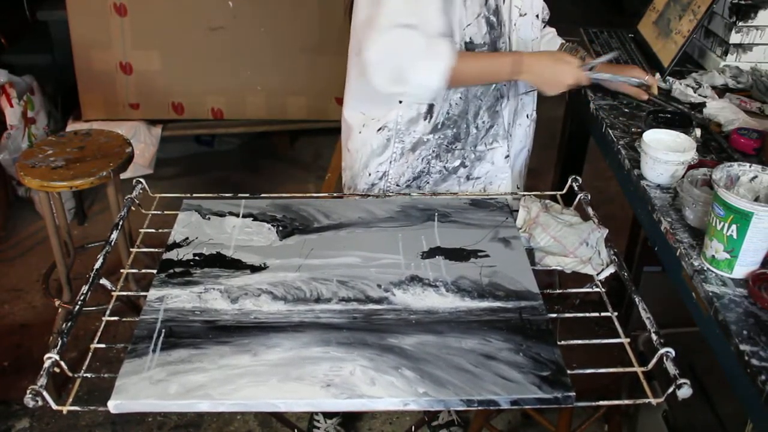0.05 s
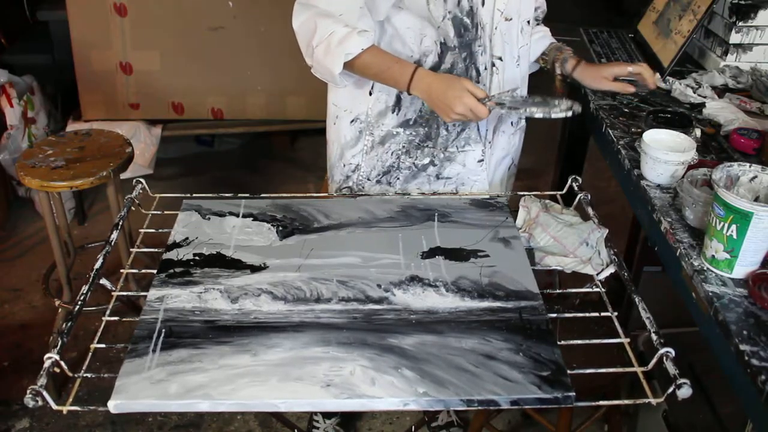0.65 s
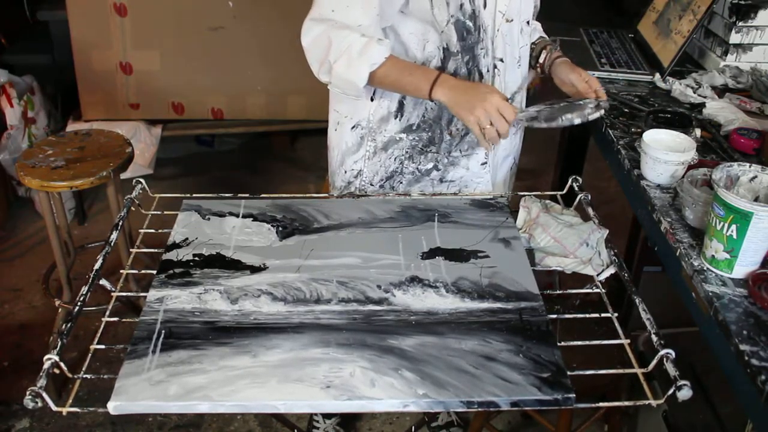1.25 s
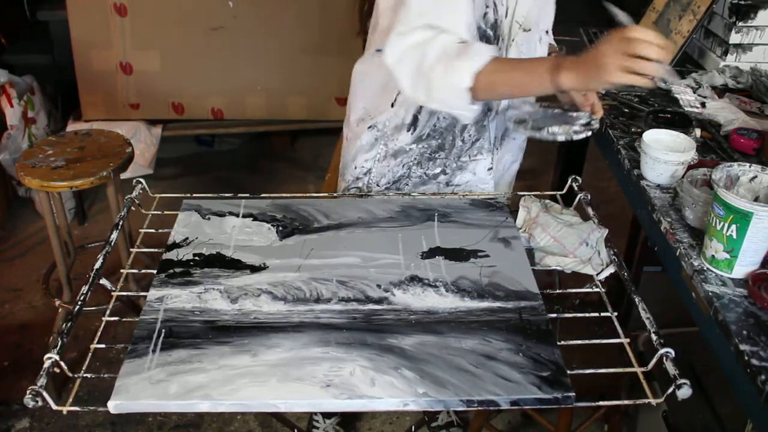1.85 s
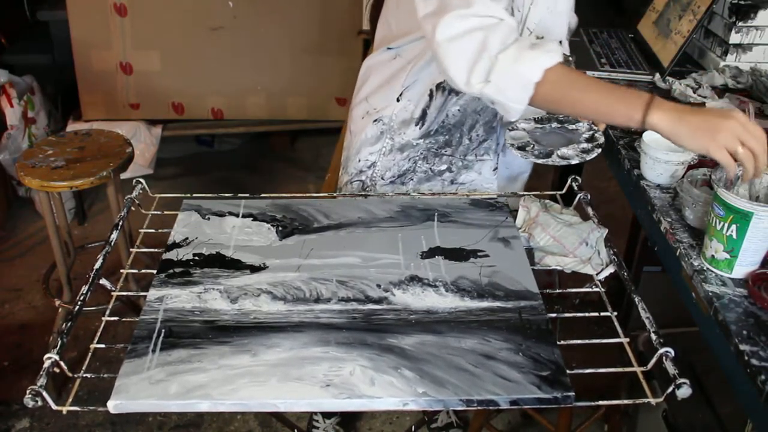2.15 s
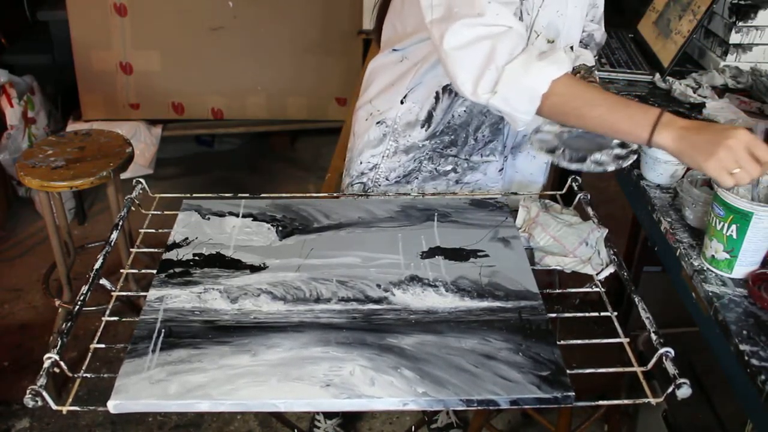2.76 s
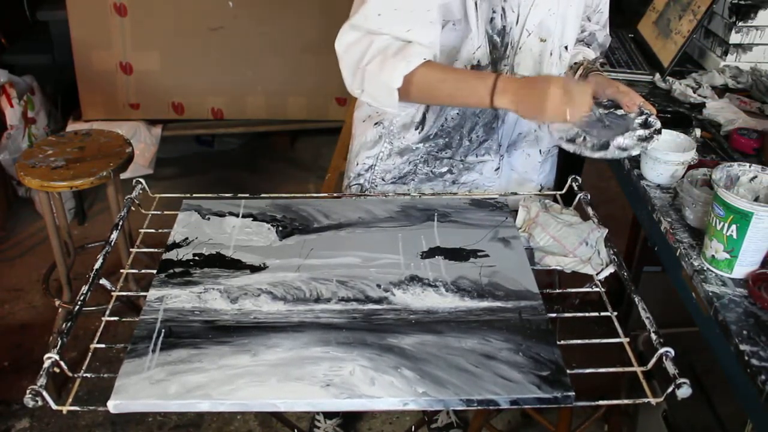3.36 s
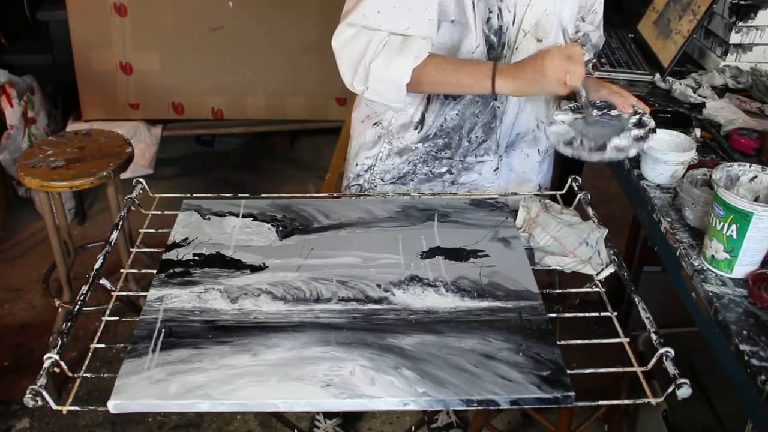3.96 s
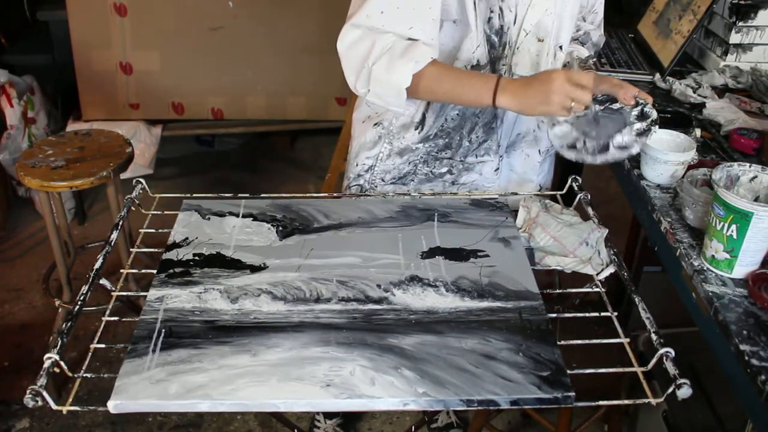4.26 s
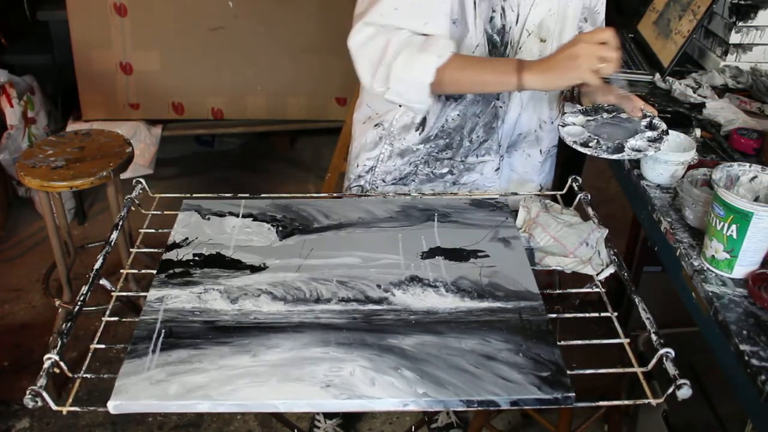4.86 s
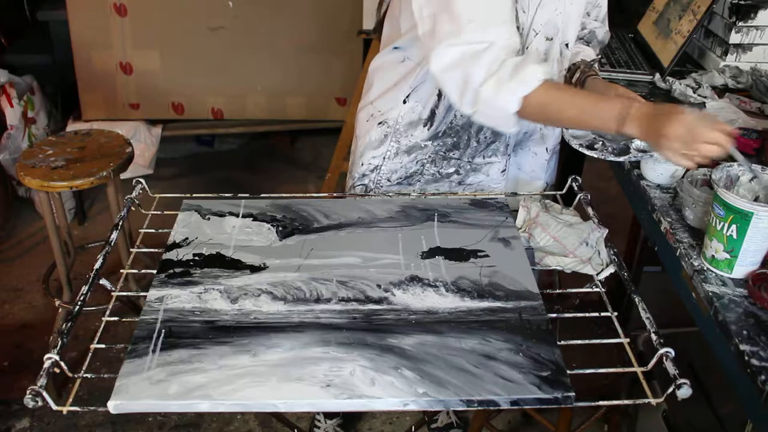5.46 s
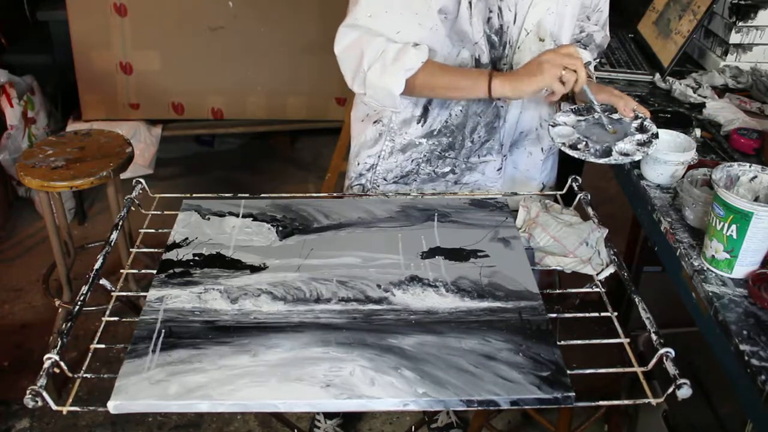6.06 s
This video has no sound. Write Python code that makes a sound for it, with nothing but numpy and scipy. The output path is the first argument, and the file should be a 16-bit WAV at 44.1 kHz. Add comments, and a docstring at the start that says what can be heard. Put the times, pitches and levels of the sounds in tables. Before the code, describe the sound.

Brush handles clink brightly and knock on a wooden workbench as a painter picks through them, and a thin one bounces to rest. A handle clacks sharply on a handheld palette, and clothing rustles faintly. The brush ticks on a paint tub, then dabs and swishes softly through wet paint, with a few dull thumps of the palette. A fan and a lamp hum steadily in the small, slightly echoing studio.

```python
"""Brush handles clink and knock on a workbench as a painter picks through them; a thin one bounces to rest.
Just after a second, a handle clacks and chatters on the handheld palette. Sleeve and smock rustle.
The brush then taps a paint tub and the palette, and from about three seconds on it dabs and swishes
through wet paint, the palette thumping in the hand.
A small studio echoes it all, and a fan and a lamp hum from start to end."""
import sys
import numpy as np
from scipy import signal
from scipy.fft import rfft, irfft, next_fast_len
from scipy.io import wavfile
from scipy.ndimage import uniform_filter1d

SR = 44100
rng = np.random.default_rng(int(sys.argv[2]) if len(sys.argv) > 2 else 0)


def to_wav(s):
    """Save 16-bit WAV."""
    ch = np.atleast_2d(s).T  # columns
    pcm = np.round(np.clip(ch, -1, 1) * 32767)  # PCM
    wavfile.write(sys.argv[1], SR, pcm.astype(np.int16))


N = 273861
TIME = np.arange(N) / SR
AGE = TIME[:SR // 2]  # seconds since a hit

# The workbench's woody modes. Each row: pitch in Hz, relative level in dB, t60 in seconds.
BENCH_MODES = [(347, -4, 0.24), (486, 6, 0.19), (558, 0, 0.039), (631, -0.5, 0.18), (755, 0, 0.18),
               (1023, 0.5, 0.11), (1571, 1.5, 0.055)]


def handle_hits(contacts, modes):
    """A hard handle snaps, rings and buzzes against its neighbours; each hit also shakes the bench."""
    # The tone of the bench. Each row: frequency in Hz, gain in dB.
    bench_eq = [(120, -31), (300, 6), (450, -6.5), (800, -1.5), (1200, -8.5), (2000, -6), (3500, -8.5),
                (6000, -11.5), (16000, -79)]
    out = np.zeros(N)
    for s, db, hz, bench_db in contacts:
        contact = blow(modes, crack_t60=.014, ring_db=-9, snap_db=17)
        buzz = amp(-5.5) * punch(burst(0.041))
        boards = blow(BENCH_MODES, crack_t60=.15, ring_db=-12, snap_db=0)
        clink = colour(contact + buzz, hump(hz, below_db=-28.0, above_db=-13.5))
        add(out, s, amp(db) * punch(clink) + amp(bench_db) * punch(colour(boards, bench_eq)))
    return out


def rummage():
    """Brush handles clink brightly together on the bench."""
    # Each row: start in seconds, clink level in dB, brightness in Hz, bench level in dB.
    clinks = [(0.0282, -20.5, 6150, -35.5), (0.0475, -25.5, 13000, -30), (0.054, -33, 6500, -42),
              (0.1136, -36, 6140, -39.5), (0.2243, -15, 9100, -46), (0.2305, -21, 6800, -31),
              (0.2859, -26.5, 7600, -38.5), (0.7914, -38, 5440, -42.5), (0.8374, -46, 6600, -47),
              (1.0363, -46.5, 6100, -66)]
    # A handle's ring. Each row: pitch in Hz, relative level in dB, t60 in seconds.
    handle_modes = [(3661, -27, 0.12), (4000, -13, 0.16), (4970, 7, 0.086), (5940, 0, 0.1),
                    (5910, 7.5, 0.042), (6710, 9.5, 0.046), (6900, 2, .09), (7130, 13.5, 0.039),
                    (7700, -14, .07), (8180, -15, 0.07), (8100, 12, 0.042), (9300, 4, 0.056),
                    (10900, -2, 0.025), (9840, 10, 0.036), (11100, -9, 0.057), (12650, -13, .05)]
    return handle_hits(clinks, handle_modes)


def dropped_brush():
    """A thin brush bounces to rest, each hit weaker, each flight a set share of the one before."""
    # The thin handle's ring. Each row: pitch in Hz, relative level in dB, t60 in seconds.
    thin_modes = [(2200, 2, .08), (2680, 7, 0.078), (4720, 12, 0.075), (5550, 6, 0.16), (7260, -7, 0.09),
                  (7550, -7, 0.078), (8450, 15, 0.063), (9000, 14, 0.073), (9700, 9, 0.044),
                  (10250, 12, 0.047), (10930, -4, 0.11), (12100, 1, 0.045), (13500, -8, .05),
                  (14300, -1, .05)]
    drop_s, first_flight_s, restitution = 0.4452, 0.0574, 0.739
    clink_db, clink_loss_db, brightness_hz = -25.5, 3, 9800
    bench_db, bench_loss_db = -36, 2.1
    landings = drop_s + first_flight_s * (1 - restitution ** np.arange(7)) / (1 - restitution)
    contacts = [(s, clink_db - k * clink_loss_db, brightness_hz, bench_db - k * bench_loss_db)
                for k, s in enumerate(landings)]
    return handle_hits(contacts, thin_modes)


def palette_clack(count):
    """A hard handle chatters on the palette and wakes its high modes, each contact weaker."""
    # The palette's bright ring. Each row: pitch in Hz, relative level in dB, t60 in seconds.
    palette_modes = [(484, -5, 0.19), (1133, 10, 0.062), (1250, -3, 0.052), (1556, 4, 0.061),
                     (2172, 1.5, .1), (2280, 4, 0.053), (3170, -16, .1), (3620, -16, 0.096),
                     (3770, -6, 0.14), (3870, -7, 0.15), (4520, -16, 0.11), (5860, -2, 0.077),
                     (5950, -6, 0.11), (7460, -5, 0.096), (8200, -15, 0.066), (9080, 9, 0.034),
                     (10800, -2, 0.068)]
    # The tone of the crack. Each row: frequency in Hz, gain in dB.
    crack_eq = [(120, -12), (330, 2.5), (700, -2), (1200, 6.5), (2300, -3), (3000, 1.5), (4000, -1.5),
                (5900, 1), (6600, -8), (7400, 2), (9100, -3.5), (12000, -6.5), (16000, -21)]
    start_s, gap_s, first_db, loss_db = 1.1911, 0.0098, -21.5, 5
    out = np.zeros(N)
    for k in range(count):
        crack = colour(burst(t60=0.07), crack_eq)
        contact = punch(crack) + amp(-3) * ring(palette_modes)
        add(out, start_s + k * gap_s, amp(first_db - k * loss_db) * contact)
    return out


def knocks():
    """Wood bumps on the bench and the tub: a softer contact, a duller sound."""
    # Each row: start in seconds, level in dB, brightness in Hz.
    bumps = [(0.001, -30, 2660), (0.063, -26.5, 1440), (0.208, -29.5, 700), (0.252, -29, 600),
             (0.797, -42.5, 1720), (0.877, -48.5, 1320), (1.734, -47, 760), (2.289, -50, 1700),
             (2.3265, -47.5, 1640), (2.386, -41, 2000), (2.752, -48, 1760)]
    out = np.zeros(N)
    for s, db, hz in bumps:
        contact = blow(BENCH_MODES, crack_t60=.055, ring_db=-10, snap_db=5)
        add(out, s, amp(db) * punch(colour(contact, hump(hz, below_db=-18.5, above_db=-10.5))))
    return out


def dabs():
    """Soft bristles flex the whole palette, which thumps in the hand."""
    # Each row: start in seconds, level in dB, brightness in Hz.
    pushes = [(3.351, -39.5, 600), (3.563, -46.5, 560), (4.3414, -20.5, 600), (5.834, -28, 340)]
    # The held palette's low modes. Each row: pitch in Hz, relative level in dB, t60 in seconds.
    held_modes = [(191, -12, 0.1), (315, -2.5, 0.091), (446, 4.5, 0.048), (520, 1.5, 0.027),
                  (675, -1.5, 0.037), (787, -3.5, 0.051)]
    attack_s, cushion_hz = 0.0015, 905  # the bristles cushion the push
    flex = ring(held_modes) * (1 - np.exp(-AGE / attack_s))
    flex = signal.sosfilt(signal.butter(4, cushion_hz, fs=SR, output="sos"), flex)
    out = np.zeros(N)
    for s, db, hz in pushes:
        add(out, s, amp(db) * punch(colour(flex, hump(hz, below_db=-14.5, above_db=-8.5))))
    return out


def ferrule_ticks():
    """The ferrule snaps on the rim of tub or palette, and the spot rings roughly and briefly."""
    # Each row: start in seconds, snap level in dB, ring pitch in Hz, ring level in dB.
    taps = [(2.4256, -47, 4360, -42.5), (2.429, -61, 2460, -42), (2.7257, -57, 4700, -49.5),
            (2.741, -57, 3760, -48), (3.3517, -42, 4540, -47), (3.355, -53, 1210, -48),
            (3.5632, -52.5, 4440, -51.5), (3.9766, -45, 4020, -60), (4.34, -39, 1380, -42.5),
            (4.564, -43, 4000, -44), (5.8342, -46.5, 1650, -54)]
    out = np.zeros(N)
    for s, snap_db, hz, ring_db in taps:
        snap = colour(burst(0.043), hump(6100, below_db=-6.5, above_db=-8.5))
        resonance = signal.iirpeak(hz, Q=6, fs=SR)
        spot = signal.lfilter(*resonance, signal.lfilter(*resonance, burst(0.048)))
        add(out, s, amp(snap_db) * punch(snap) + amp(ring_db) * punch(spot))
    return out


def bristles():
    """Hairs bend, slide through wet paint as the pressure eases, and lift."""
    # Each row: start in seconds, length in seconds, level in dB, rasp pitch in Hz.
    strokes = [(3.395, 0.042, -52.5, 4020), (3.577, 0.1, -54, 4100), (3.991, 0.037, -48.5, 3600),
               (4.067, 0.033, -50, 4130), (4.296, 0.038, -41.5, 1540), (4.425, 0.02, -45, 8350),
               (4.546, 0.072, -47, 1630), (4.771, 0.041, -43, 3730), (5.942, 0.08, -51, 3840),
               (6.107, 0.11, -51.5, 3900)]
    attack_s, ease_db_per_s, release_s = 0.016, 29, 0.011
    out = np.zeros(N)
    for (s, length, db, _), rasp in zip(strokes, rub([hz for *_, hz in strokes])):
        age = np.maximum(TIME - s, 0)
        press = (1 - np.exp(-age / attack_s)) * amp(db - ease_db_per_s * age)
        lift = np.exp(-np.maximum(age - length, 0) / release_s)
        out += press * lift * rasp
    return out


def sleeve():
    """Cloth slides over cloth, swelling and fading with each reach of the arm."""
    # Each row: peak time in seconds, level in dB, rasp pitch in Hz.
    reaches = [(1.41, -61, 1570), (1.88, -54.5, 5130), (2.07, -57, 4000), (5.12, -57.5, 1570),
               (5.68, -60.5, 2130)]
    rasps = rub([hz for *_, hz in reaches])
    return sum(amp(db) * swell(s, spread_s=0.069) * rasp for (s, db, _), rasp in zip(reaches, rasps))


def rub(pitches):
    """Countless fibres slip and catch; one rasping texture for each pitch."""
    # The tone of rubbing fibres. Each row: frequency in Hz, gain in dB.
    fibre_eq = [(300, -27), (1000, -1.5), (1550, 4.5), (1900, -1.5), (2400, 3.5), (3000, -1), (3900, 1.5),
                (6000, -3.5), (8300, -2.5), (10000, -7.5), (12000, -9), (16000, -27)]
    grain = rng.standard_normal(N) * amp(1.95 * rng.exponential(size=N) + 2.1 * wander(60))
    slips = colour(grain, fibre_eq)
    return [unit(slips + 0.85 * signal.lfilter(*signal.iirpeak(hz, Q=6, fs=SR), slips))
            for hz in pitches]


def smock():
    """Heavy cloth gives a low, soft flutter as the arm moves."""
    # Each row: peak time in seconds, level in dB, spread in seconds.
    flaps = [(2.05, -49.5, 0.028), (3.02, -50.5, 0.098), (4.27, -51, 0.036)]
    motion = sum(amp(db) * swell(s, spread) for s, db, spread in flaps)
    return motion * unit(colour(rng.standard_normal(N), hump(273, below_db=-25.0, above_db=-20.5)))


def studio(x, wet_db, bass_db, build_s):
    """Direct sound from the right, then dense reflections whose treble dies first."""
    noise = diffuse(len(AGE), alike_hz=1570)
    low = signal.sosfilt(signal.butter(1, 3500, fs=SR, output="sos"), noise)
    tail = low * fade(.25) + (noise - low) * fade(.12)
    tail = amp(wet_db) * unit(tail * (1 - np.exp(-AGE / build_s))) / np.sqrt(len(AGE))
    send = colour(x, [(500, bass_db), (3000, 0)])  # a little less bass goes into the room's echo
    direct = np.array([np.append(0, x[:-1]), x])
    return direct + signal.fftconvolve(send[None], tail, axes=1)[:, :N]


def fan():
    """A wavering low drone, narrow fluttering tones, duct rumble and a smooth hiss of air."""
    # The fluttering tones. Each row: pitch in Hz, level in dB, width in Hz.
    tones = [(50, -66.5, 2), (112.2, -59, 2), (224.4, -57, 5), (294.3, -59, 5), (338.2, -58, 3),
             (1558, -76, 170)]
    # The tone of the duct and of the air. Each row: frequency in Hz, gain in dB.
    duct_eq = [(20, -60), (28, -38), (37, 2.5), (50, 4.5), (62, 6), (112, -16.5), (138, -5.5), (185, -2),
               (240, 7), (262, -3), (320, 4), (385, -8.5), (450, -2), (700, -19)]
    air_eq = [(350, -34), (600, 0.5), (679, -6), (1130, -4.5), (1570, -5), (1780, -6.5), (2570, -7),
              (3160, -7.5), (3390, -8), (8160, -14), (16000, -24.5)]
    drone_hz, waver_hz, drone_db, waver_db = 73.7, 0.34, -43, 0.66
    rumble_db, air_db = -50.5, -55
    cycles = np.cumsum(drone_hz + waver_hz * wander(3.6)) / SR
    drone = np.sqrt(2) * amp(drone_db + waver_db * wander(4)) * np.sin(2 * np.pi * cycles)
    for hz, db, width in tones:
        phase = 2 * np.pi * hz * TIME
        drone += amp(db) * (wander(width / 2) * np.sin(phase) + wander(width / 2) * np.cos(phase))
    rumble = np.array([colour(x, duct_eq + [(2000, -48.5)]) for x in diffuse(N, alike_hz=960)])
    air = np.array([colour(x, air_eq) for x in diffuse(N, alike_hz=686)])
    return drone + amp(rumble_db) * unit(rumble) + amp(air_db) * unit(air)


def lamp():
    """Steady overtones of the mains: a hum and a thin whine."""
    # Each row: multiple of the mains frequency, level in dB.
    overtones = [(2, -62.5), (27, -75), (44, -94.5), (49, -77), (51, -73), (52, -67), (54, -80), (55, -81)]
    mains_hz = 60
    return np.sqrt(2) * sum(amp(db) * np.sin(2 * np.pi * (k * mains_hz * TIME + rng.random()))
                            for k, db in overtones)


def blow(modes, crack_t60, ring_db, snap_db):
    """A contact snap, a crack of dense short modes and the ring of the object."""
    x = punch(burst(crack_t60)) + amp(ring_db) * ring(modes)
    x[0] += amp(snap_db)
    return x


def ring(modes):
    """Damped modes, struck a little differently each time."""
    return punch(sum(amp(db + rng.standard_normal()) * (-1) ** k * fade(t60)
                     * np.sin(2 * np.pi * hz * AGE) for k, (hz, db, t60) in enumerate(modes)))


def burst(t60):
    """A dying puff of white noise."""
    return rng.standard_normal(len(AGE)) * fade(t60)


def fade(t60):
    """A decay of 60 dB in t60 seconds."""
    return np.exp(-np.log(1000) * AGE / t60)


def swell(peak_s, spread_s):
    """A bell-shaped rise and fall."""
    return np.exp(-.5 * ((TIME - peak_s) / spread_s) ** 2)


def wander(hz):
    """Smooth random drift up to hz, with rms 1."""
    points = rng.standard_normal(int(2 * hz * N / SR) + 2)
    return unit(signal.resample(points, next_fast_len(N))[:N])


def diffuse(size, alike_hz):
    """Stereo noise that is alike in the bass and unrelated in the treble."""
    mid, side = rng.standard_normal((2, size))
    side = signal.sosfilt(signal.butter(1, alike_hz, "high", fs=SR, output="sos"), side)
    return np.array([mid + side, mid - side])


def colour(x, points):
    """Minimum-phase EQ through (Hz, dB) points."""
    size = 2 * next_fast_len(len(x), True)
    hz, db = np.transpose(points)
    curve = np.interp(np.log(np.fft.rfftfreq(size, 1 / SR) + 1), np.log(hz), db)
    cepstrum = irfft(np.log(amp(curve)))[:size // 2]
    cepstrum[1:] *= 2
    return irfft(rfft(x, size) * np.exp(rfft(cepstrum, size)))[:len(x)]


def hump(hz, below_db, above_db):
    """A broad EQ hump with given gains two octaves below and one above."""
    return [(hz / 20, 2 * below_db), (hz / 4, below_db), (hz / np.sqrt(2), 0),
            (hz * 2 ** (1 / 4), 0), (hz * 2, above_db), (hz * 10, 2 * above_db)]


def amp(db):
    """Decibels to gain."""
    return 10 ** (np.asarray(db) / 20)


def unit(x):
    """Scale to rms 1."""
    return x / np.sqrt(np.mean(x ** 2))


def punch(x):
    """Scale a hit so that its loudest 4 ms have rms 1."""
    return x / np.sqrt(uniform_filter1d(x ** 2, size=176).max())


def add(track, s, x):
    """Mix a sound in at s seconds."""
    start = max(int(s * SR), 0)
    track[start:start + len(x)] += x[:N - start]


def scene():
    """All the handling in the room, over the fan and the lamp; the soft dabs stir the room less."""
    bench = rummage() + dropped_brush() + knocks()
    mixing = palette_clack(count=5) + ferrule_ticks() + bristles()
    work = studio(bench + mixing + sleeve() + smock(), wet_db=-2.5, bass_db=-1.0, build_s=0.00047)
    thumps = studio(dabs(), wet_db=-7, bass_db=-1.5, build_s=0.002)
    return work + thumps + fan() + lamp()


def record(dry):
    """The left microphone has a little more bass; the top is cut steeply."""
    bass_hz, top_hz = 900, 15850
    bass = signal.sosfilt(signal.butter(1, bass_hz, fs=SR, output="sos"), dry)
    heard = dry + 0.11 * np.array([[1], [-1]]) * bass
    return signal.sosfilt(signal.ellip(10, .2, 80, top_hz, fs=SR, output="sos"), heard)


dry = scene()
out = record(dry)
to_wav(out)
```